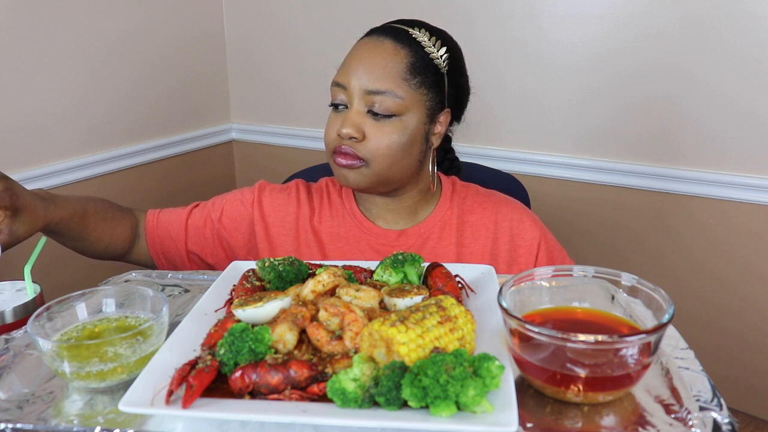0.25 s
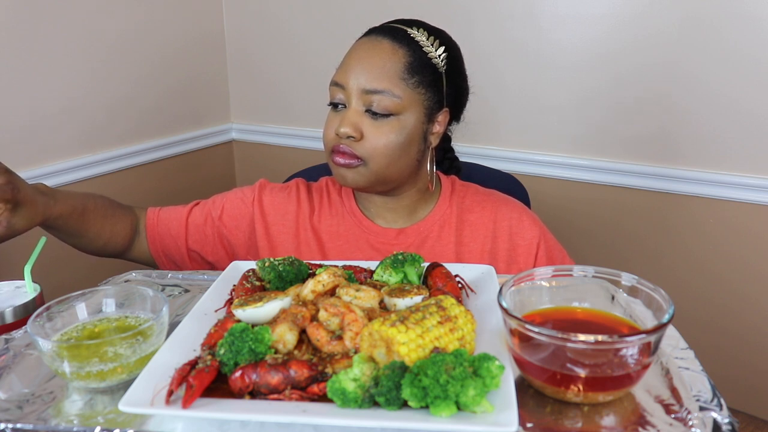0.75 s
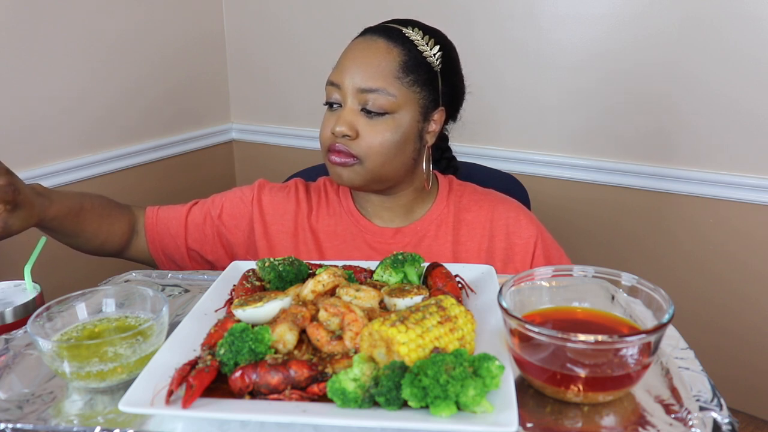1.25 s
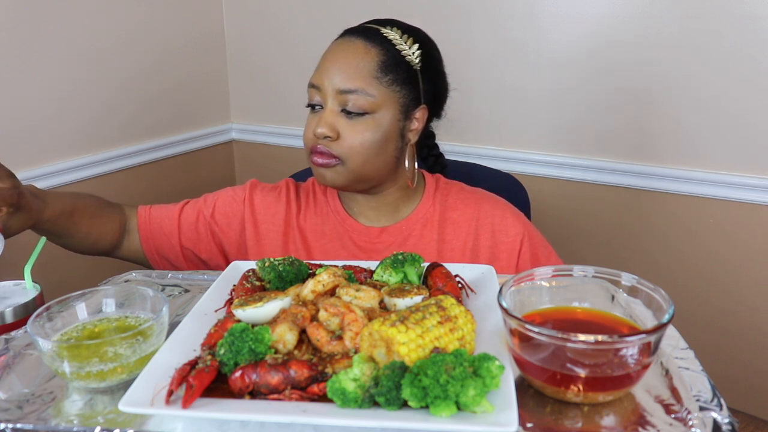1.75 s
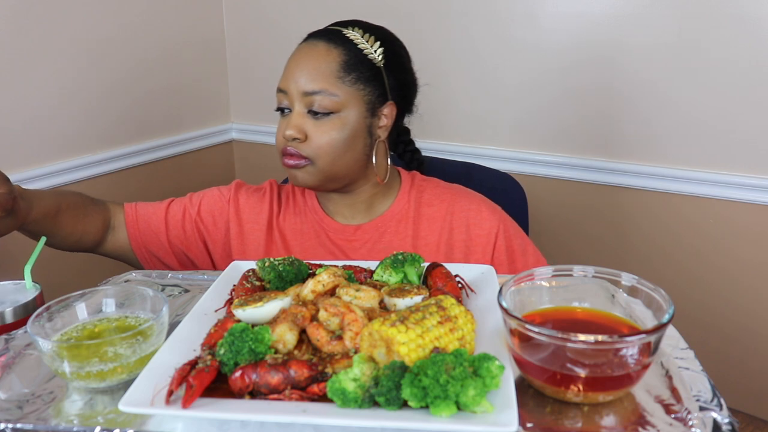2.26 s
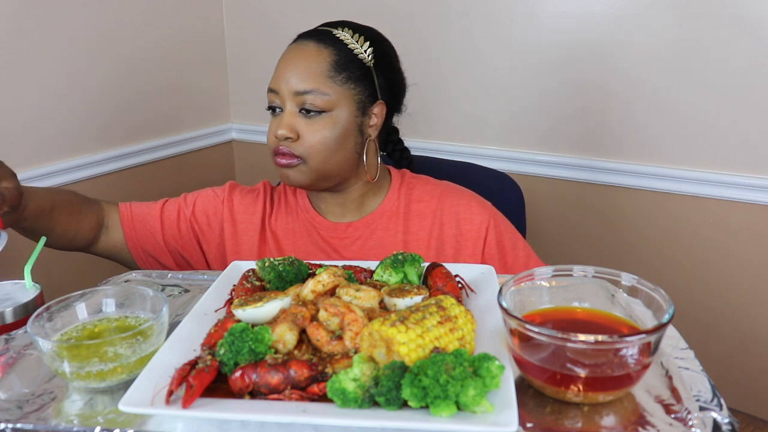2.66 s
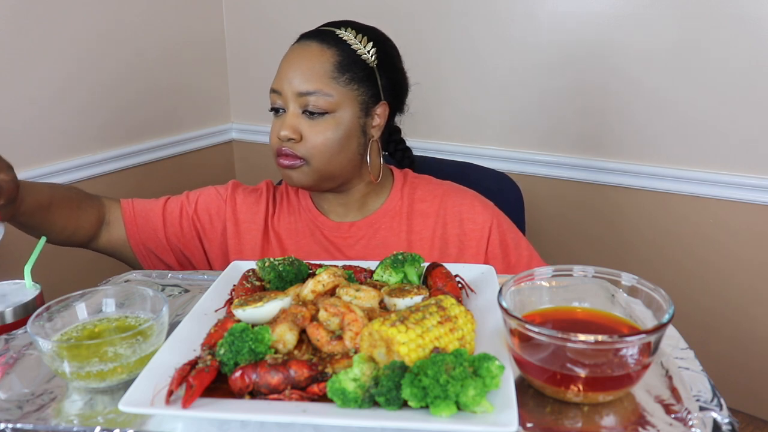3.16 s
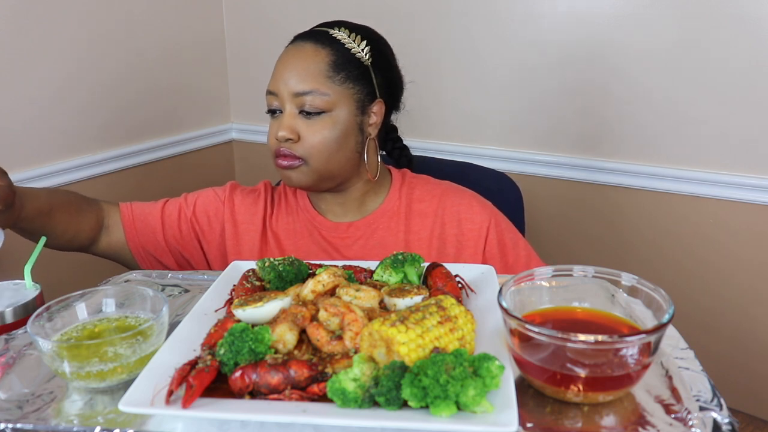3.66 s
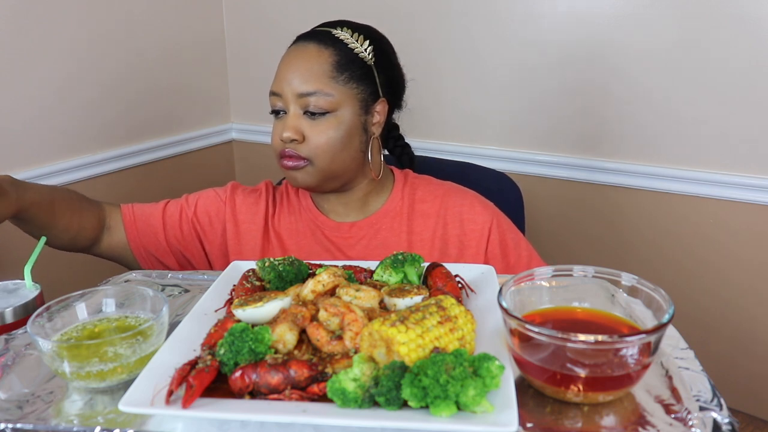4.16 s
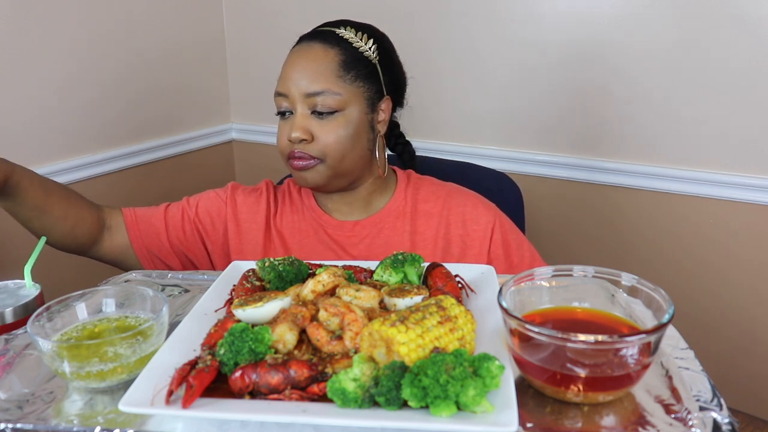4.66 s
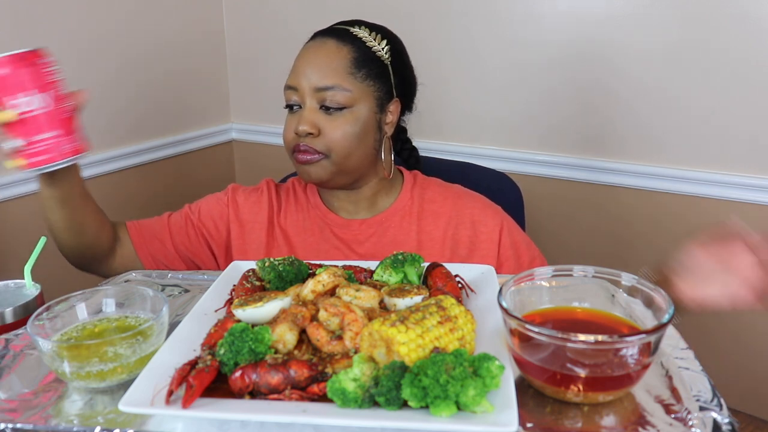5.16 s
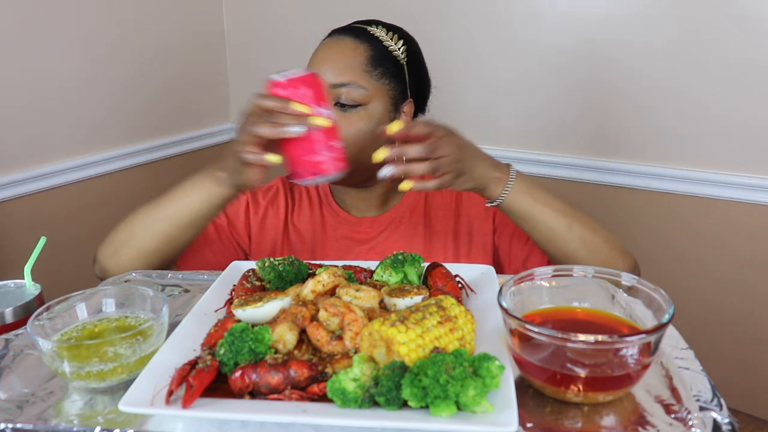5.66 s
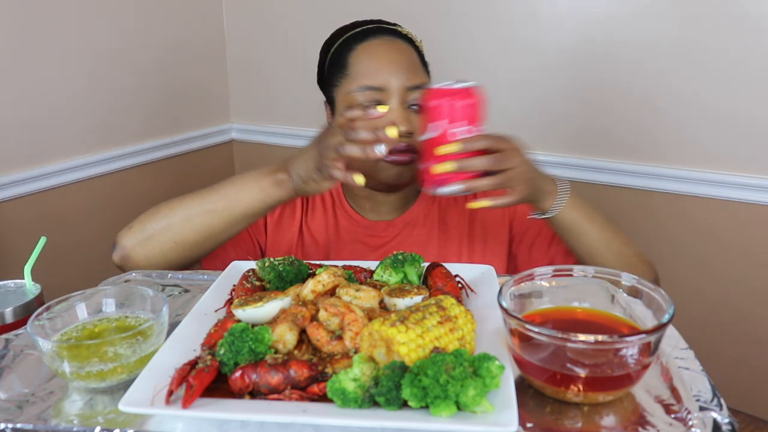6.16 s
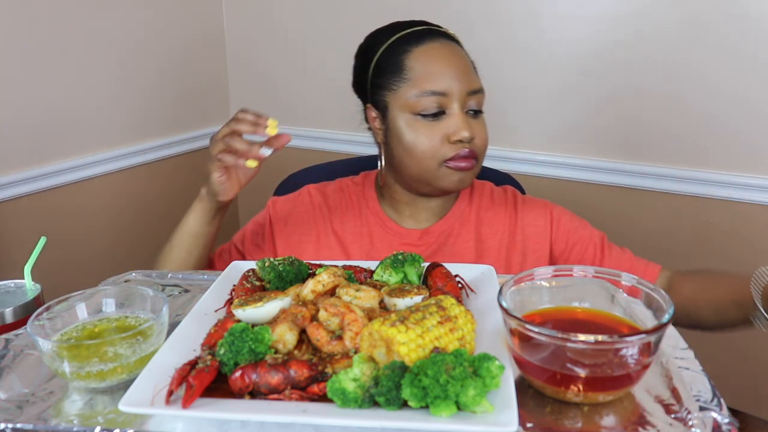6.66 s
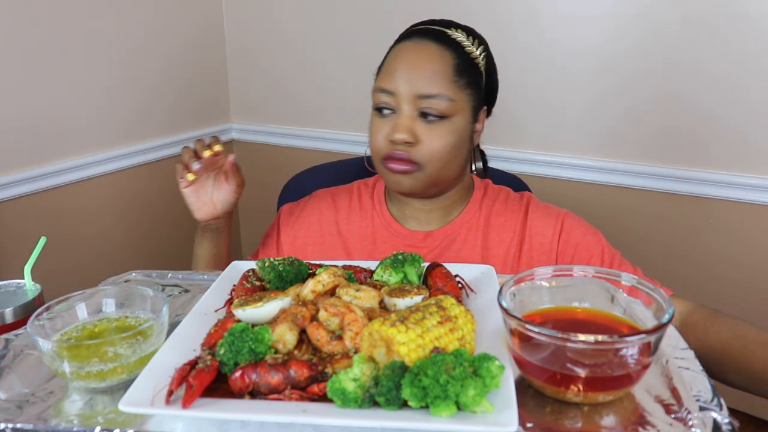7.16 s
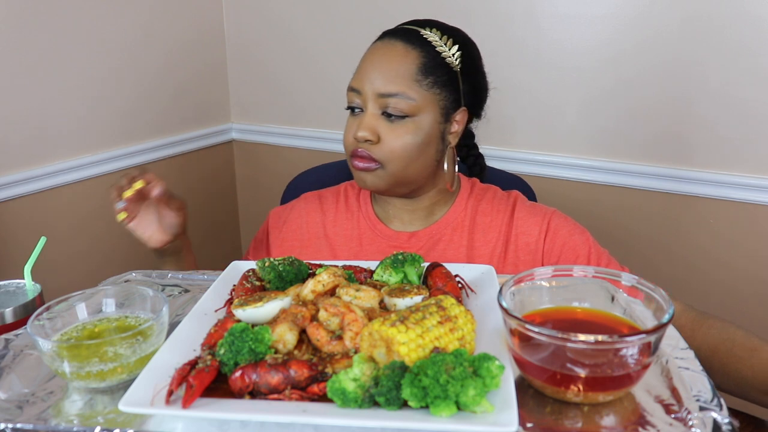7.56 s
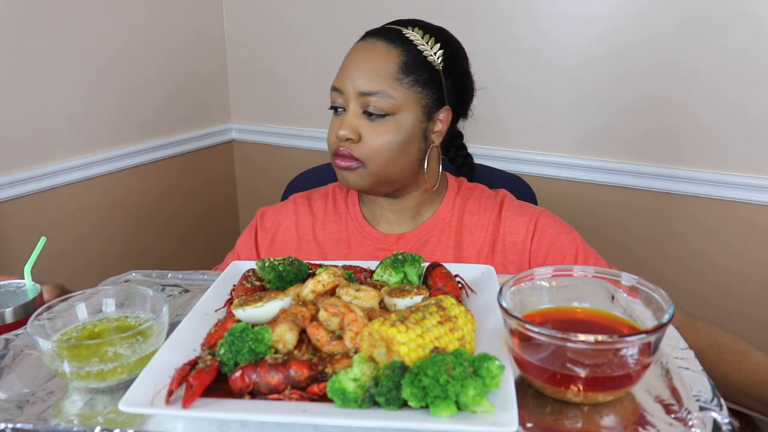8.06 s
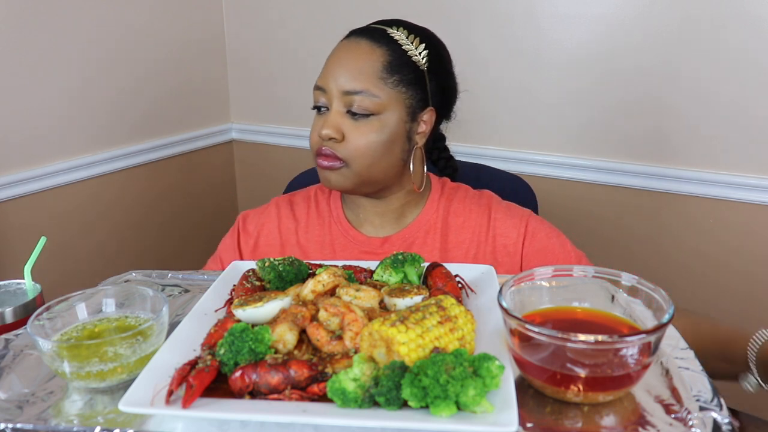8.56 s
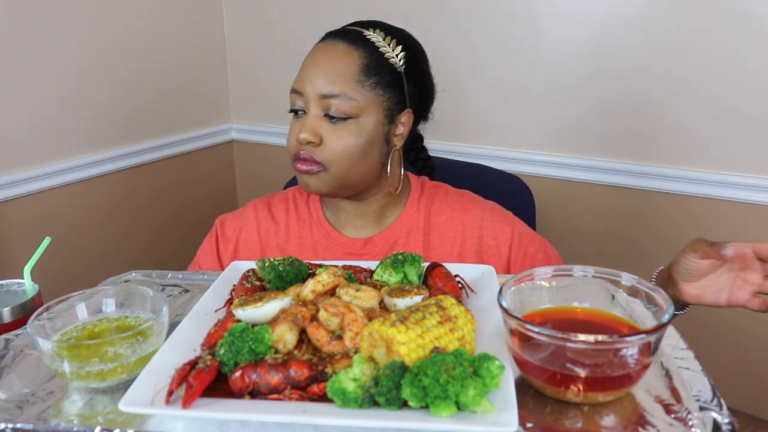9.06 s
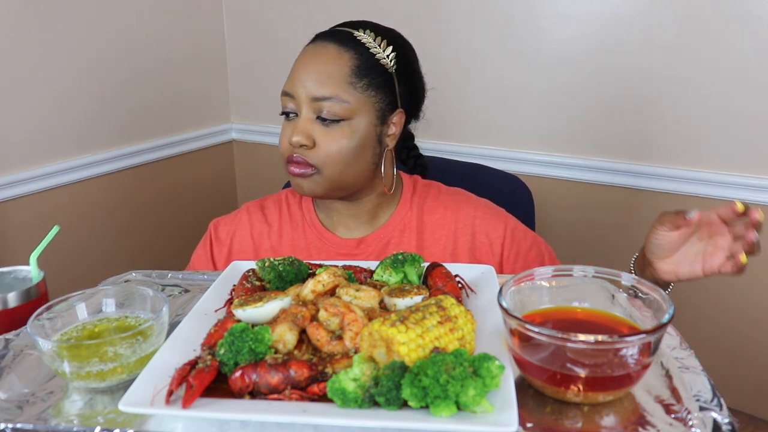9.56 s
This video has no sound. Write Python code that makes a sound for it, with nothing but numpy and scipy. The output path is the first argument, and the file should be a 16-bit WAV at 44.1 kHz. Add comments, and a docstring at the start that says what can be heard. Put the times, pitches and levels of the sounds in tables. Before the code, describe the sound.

A dense carbonated hiss swells and brightens, ice clunks, the fizz dies into tiny pops, and one hard can knock rings the tabletop.

```python
"""A small room with a low ventilation rumble, one microphone close to a cup on a table.
Soda is poured over ice: ringing bubbles and snapping films make a foam that swells, climbs in pitch and dies
to a crackle. Ice knocks on the cup's modes and cracks, lone bubbles plink and chains of them trill upwards.
The empty can is set down with one sharp knock that rings the table top; sleeves rustle faintly."""
import sys
import numpy as np
from scipy import signal
from scipy.fft import rfft, irfft, next_fast_len
from scipy.io import wavfile

SR = 44100
rng = np.random.default_rng(int(sys.argv[2]) if len(sys.argv) > 2 else 0)


def dump(signal):
    """Clip the signal to [-1, 1] and save it as 16-bit WAV at the path in sys.argv[1]."""
    limited = np.clip(np.atleast_2d(signal).T, -1, 1)
    pcm = np.round(limited * 32767).astype(np.int16)
    wavfile.write(sys.argv[1], SR, pcm)


N = 432621
T = np.arange(N) / SR  # time/s

# ventilation spectrum, relative: f/Hz, level/dB per Hz
AIR_SPECTRUM = [(30, -30), (45, -21), (60, -24), (85, -22.5), (125, -10.5), (165, -7), (215, 1), (300, -4),
                (450, -14.5), (700, -20.5), (1400, -25.5), (3000, -32), (15000, -26.5)]
HUM_DB = -62.5  # mains hum at rest
# the hum grows for a moment: from t/s, to t/s, ramp/s, rise/dB
HUM_SWELL = (5.7, 6.8, 0.1, 7.5)

# rustle of cloth, relative: f/Hz, level/dB per Hz
CLOTH_SPECTRUM = [(200, -27), (500, 4), (800, 3.5), (1400, -2.5), (3000, -5), (10000, -15)]
# the arms move and the sleeves brush: middle t/s, half length/s, level/dB
ARM_MOVES = [(5.95, 0.48, -60.5), (6.9, 0.53, -60.5), (9.245, 0.53, -63)]
CLOTH_REST_DB = -80

# colour that the cup gives the ringing bubbles, relative: f/Hz, level/dB
BUBBLE_COLOUR = [(700, -39), (1000, -1.5), (1450, 5), (2200, -9), (2600, -0.5), (3100, -6.5), (4100, 0.5),
                 (5400, -4.5), (6400, -2.5), (8500, -2.5), (10000, 1.5)]
# snapping films, relative: f/Hz, level/dB per Hz
SNAP_SPECTRUM = [(8000, 5), (9400, -5), (10700, -2.5), (13000, 2), (15500, -8)]
# bubble size: t/s, commonest pitch f/Hz, fall towards finer bubbles/dB per octave
BUBBLE_SIZE = [(0, 1470, 3), (1.0, 2300, 2.5), (1.7, 3910, 6), (2.5, 4870, 14), (3.1, 3600, 1.5),
               (3.9, 4500, 6), (4.45, 5900, 7.5), (5.6, 7640, 13), (9.0, 7500, 0)]
# air resonances of the cup: f/Hz, width/Hz, boost/dB
CUP_PEAKS = [(2008, 65, 5), (2390, 750, 3), (3570, 220, 0.5), (4300, 117, -0.5), (5250, 180, 3),
             (6280, 1040, 3), (7560, 310, 3)]
# the foam builds while the drink is poured, holds, then dies away
# its levels are relative: the gains in foam() and cup() come on top
RING_START_DB, RING_FULL_DB, RING_REST_DB = -38.5, -34.5, -55.5  # ringing bubbles
RING_BUILD_FROM_S, RING_FULL_S, RING_FADE_FROM_S, RING_FADE_S = 0.78, 1.84, 4.13, 2.72
SNAP_START_DB, SNAP_FULL_DB, SNAP_REST_DB = -47, -43, -56  # snapping films
SNAP_BUILD_FROM_S, SNAP_FULL_S, SNAP_FADE_FROM_S, SNAP_FADE_S = 0.2, 3.3, 4.73, 1.8
POURING_BURSTS_PER_S, RESTING_BURSTS_PER_S, THINNING_FROM_S, THINNING_S = 28000, 1300, 4.1, 1.25
SNAP_SPREAD_DB = 4.2

# ice knocks against the cup: t/s, level/dB, contact brightness f/Hz
ICE_KNOCKS = [(.589, -19, 2500), (2.923, -1.5, 3000), (2.929, 2, 600), (2.9415, -4.5, 1200),
              (2.993, -4, 250)]
# modes of the filled cup: f/Hz, level/dB, t60/s
CUP_BODY = [(170, -34.5, 0.07), (207, -29, 0.091), (286, -26, 0.1), (470, -28.5, 0.029), (800, -25, 0.017),
            (910, -30, 0.035), (1030, -30, 0.031), (1290, -29, 0.02), (1600, -26, 0.007), (2450, -40, .025)]
# dull thumps of handling and, near 8.07 s, of the can settling: t/s, peak level/dB, f/Hz
BUMPS = [(0.789, -45, 190), (1.478, -43.5, 363), (1.496, -38, 164), (1.736, -41, 171), (2.123, -40, 156),
         (8.072, -36.5, 510), (8.08, -38, 375), (9.442, -35, 196), (9.471, -35, 180), (9.508, -35.5, 252)]
BUMP_T60_S = 0.067
# two dry ice cracks, each followed about 2 ms later by a weaker reflection: t/s, peak level/dB, f/Hz, t60/s
CRACKS = [(3.4028, -17, 1280, 0.0055), (3.405, -34, 1410, .006), (3.5408, -7, 1700, 0.0021),
          (3.5428, -23, 1480, 0.01)]

# single pops at set times, most of them short, one faint and ringing: t/s, peak level/dB, f/Hz, t60/s
SINGLE_POPS = [(6.098, -41, 3100, .015), (6.19, -47, 3000, 0.17), (6.202, -33, 2400, .004),
               (6.205, -31, 3500, .0045), (7.4827, -31, 6700, .01), (8.593, -30, 5740, .007),
               (8.7675, -28, 9530, 0.0026), (8.8595, -30, 3670, 0.002), (9.137, -29, 6690, .003),
               (9.3898, -31, 9050, .004)]
# once the foam has thinned, stray bubbles burst at random
STRAY_FROM_S, STRAY_DB, STRAY_SPREAD_DB, STRAY_T60_S = 4.8, -34.5, 4, 0.008
STRAY_HZ, STRAY_SPREAD_OCTAVES, STRAY_DB_PER_OCTAVE = 6700, 0.386, 3

# the largest lone bubbles: t/s, peak level/dB, starting f/Hz
PLINKS = [(6.6473, -26.5, 4130), (6.802, -33, 3600), (6.862, -31.5, 5350), (6.93, -28, 4030),
          (7.0814, -39, 3750), (7.916, -36, 4040), (8.4777, -39, 2340), (8.488, -33, 2950),
          (8.575, -38.5, 3140), (9.4615, -39.5, 5570), (9.549, -43, 2450), (9.6346, -40, 3970),
          (9.665, -39, 4580)]
# chains of shrinking bubbles: start t/s, length/s, first f/Hz, last f/Hz, middle peak level/dB, pitch scatter/share
TRILLS = [(6.624, 0.29, 4350, 6200, -39.5, 0.086), (6.9, 0.31, 6100, 8700, -38.5, .04),
          (8.475, 0.17, 2500, 6160, -47.5, 0.072), (9.105, .05, 2570, 6260, -53, .12),
          (9.174, 0.22, 6500, 8150, -43, .1), (9.45, 0.13, 6000, 8700, -45.5, 0.089),
          (9.568, .04, 3200, 5600, -54.5, .04), (9.634, 0.2, 4300, 6100, -46.5, .05)]
# a rise is the mean share by which the pitch lies above its start over one t60
PLINK_T60_S, PLINK_RISE = .014, .1
CHAIN_T60_S, CHAIN_RISE = .012, .04

# the can lands and settles: t/s, level/dB, contact brightness f/Hz
CAN_KNOCKS = [(7.8535, 0, 3020), (8.07, -23, 600)]
# modes of can and table top: f/Hz, level/dB, t60/s
TABLE_MODES = [(265, -37, .4), (287, -37, .4), (340, -30, .27), (371, -29, .33), (428, -30, .2),
               (488, -24, .12), (544, -29, .2), (686, -28, .21), (737, -25, .21), (840, -29, .25),
               (904, -32, .33), (969, -30, .22), (1039, -30, .19), (1145, -27, .22), (1245, -29, .25),
               (1303, -35, .25), (1400, -31, .18), (1556, -31, .16), (1663, -26, .15), (1701, -25, .2),
               (1846, -36, .2), (1960, -37, .18), (3138, -39, .2), (3262, -42, .2), (5545, -47, .17),
               (5776, -46, .17)]
# dense rattle of the table top, relative: f/Hz, level/dB per Hz
RATTLE_SPECTRUM = [(120, -24), (220, 0), (330, -0.5), (900, 1), (1750, -1), (2400, -25), (3200, -12),
                   (4300, -29), (5700, -11), (7500, -32), (12000, -70)]
# the can slides a little as it is let go: middle t/s, half length/s, level/dB
SLIDE = (8.16, 0.02, -59.5)
CLACK_DB = -8.0

CUP_ROOM_T60_S = .22
CUTOFF_HZ = 15750  # top of the microphone's range


def from_db(db):
    """Decibels to gain."""
    return 10 ** (np.asarray(db) / 20)


def rms_one(x):
    """Scale to unit power."""
    return x / np.sqrt(np.mean(x ** 2) + 1e-20)


def at_hz(points, hz):
    """Read a spectrum in dB on a log-frequency axis."""
    f, db = np.transpose(points)
    return np.interp(np.log(hz + 1e-9), np.log(f), db)


def coloured(x, spectrum):
    """Give a signal a spectrum by weighting its frequencies; rms 1."""
    size = next_fast_len(N)
    gain = from_db(at_hz(spectrum, np.fft.rfftfreq(size, 1 / SR)))
    return rms_one(irfft(rfft(x, size) * gain, size)[:N])


def low_cut(x, hz):
    """Second-order high-pass."""
    return signal.sosfilt(signal.butter(2, hz, "high", fs=SR, output="sos"), x + 1e-18)


def decay(t, t60):
    """Exponential decay that falls 60 dB in t60."""
    return np.exp(-np.log(1000) * t / t60)


def ring(clicks, hz, t60):
    """A two-pole resonator: a unit click sets a sine of height 1 ringing."""
    r = decay(1 / SR, t60)
    w = 2 * np.pi * hz / SR
    return signal.lfilter([0, np.sin(w)], [1, -2 * r * np.cos(w), r * r], clicks + 1e-18)


def add_ping(out, s, db, hz, t60, rise=0.):
    """Add one dying sine, whose pitch may climb as it dies."""
    t = T[:int(t60 * SR)]
    cycles = hz * t * (1 + rise * t / t60)
    ping = from_db(db) * np.sin(2 * np.pi * cycles) * decay(t, t60)
    place = out[int(s * SR):][:len(t)]
    place += ping[:len(place)]


def thuds(rows, low_cut_hz):
    """Damped blows, each with one main resonance; small things radiate no deep bass."""
    out = np.zeros(N)
    for s, db, hz, t60 in rows:
        add_ping(out, s, db, hz, t60)
    return low_cut(out, low_cut_hz)


def pushes(rows):
    """Contact forces; a soft contact is a longer push."""
    out = np.zeros(N)
    for s, db, bright_hz in rows:
        soft = np.exp(-2 * np.pi * bright_hz / SR)
        click = np.arange(N) == int(s * SR)
        out += from_db(db) * signal.lfilter([1 - soft], [1, -soft], click + 1e-18)
    return out


def ventilation(air_db=-50.0, hum_hz=120):
    """A low rush of air, as coloured noise, and a mains hum, as a sine that swells once."""
    from_s, to_s, ramp_s, rise_db = HUM_SWELL
    swell = np.clip(np.minimum(T - from_s, to_s - T) / ramp_s, 0, 1)
    hum = from_db(HUM_DB + rise_db * swell) * np.sin(2 * np.pi * hum_hz * T)
    return from_db(air_db) * coloured(rng.standard_normal(N), AIR_SPECTRUM) + hum


def sleeves():
    """A faint rustle of cloth, as coloured noise that swells with each arm movement."""
    level = from_db(CLOTH_REST_DB)
    for s, half_s, db in ARM_MOVES:
        level = level + from_db(db) * np.exp(-((T - s) / half_s) ** 2)
    return level * coloured(rng.standard_normal(N), CLOTH_SPECTRUM)


def dying(from_s, fade_s):
    """One until from_s, then an exponential fall with time constant fade_s."""
    return np.exp(-np.maximum(T - from_s, 0) / fade_s)


def build_and_fade(start_db, full_db, rest_db, build_from_s, full_s, fade_from_s, fade_s):
    """A level in dB that climbs, holds and settles to rest."""
    poured_db = np.interp(T, [build_from_s, full_s], [start_db, full_db])
    return rest_db + (poured_db - rest_db) * dying(fade_from_s, fade_s)


def bursts(per_s, spread_db, largest):
    """Random clicks of either sign and uneven size, scaled so that power does not follow their rate."""
    sizes = from_db(spread_db * np.minimum(rng.exponential(1, N), largest))
    signs = rng.choice([-1, 1], N)
    happens = rng.random(N) < per_s / SR
    return sizes * signs * happens / np.sqrt(per_s)


def grains(clicks, pitches, cycles, band_db):
    """Deal clicks to briefly ringing bubbles with levels band_db(Hz); the gains are scaled to unit power."""
    dealt = rng.integers(0, len(pitches), N)
    out, power = 0, 0
    for k, hz in enumerate(pitches):
        # the square root allows for bands that widen with pitch
        gain = np.sqrt(hz) * from_db(band_db(hz))
        # a bubble radiates nothing far below its own pitch
        edges = np.diff(clicks * (dealt == k), prepend=0)
        voice = ring(edges, hz, cycles / hz)
        out = out + gain * rms_one(voice)
        power = power + gain ** 2
    return out / np.sqrt(power)


def foam(below_db=13.0, ring_gain_db=-0.44, snap_gain_db=3.0, count=40):
    """Bursting bubbles ring briefly around a common pitch, and their films snap far above it."""
    ring_db = build_and_fade(RING_START_DB, RING_FULL_DB, RING_REST_DB,
                             RING_BUILD_FROM_S, RING_FULL_S, RING_FADE_FROM_S, RING_FADE_S)
    snap_db = build_and_fade(SNAP_START_DB, SNAP_FULL_DB, SNAP_REST_DB,
                             SNAP_BUILD_FROM_S, SNAP_FULL_S, SNAP_FADE_FROM_S, SNAP_FADE_S)
    extra_per_s = POURING_BURSTS_PER_S - RESTING_BURSTS_PER_S
    per_s = RESTING_BURSTS_PER_S + extra_per_s * dying(THINNING_FROM_S, THINNING_S)
    size_s, size_hz, finer_db = np.transpose(BUBBLE_SIZE)
    octave = np.log2(np.interp(T, size_s, size_hz))
    above_db = np.interp(T, size_s, finer_db)

    def sizes_db(hz):
        """Bubbles much larger or smaller than the common size are weak."""
        away = np.log2(hz) - octave
        return at_hz(BUBBLE_COLOUR, hz) + np.minimum(below_db * away, -above_db * away)

    ring_clicks = bursts(per_s, spread_db=0.0, largest=4.2)
    rings = grains(ring_clicks, np.geomspace(850, 9500, count), 17.7, sizes_db)
    # above the finest ringing bubble only the films are heard
    rings = signal.sosfilt(signal.butter(6, 10500, fs=SR, output="sos"), rings)
    snap_clicks = bursts(per_s, SNAP_SPREAD_DB, largest=3.3)
    snaps = grains(snap_clicks, np.geomspace(8500, 15500, 9), 9.3, lambda hz: at_hz(SNAP_SPECTRUM, hz))
    return from_db(ring_db + ring_gain_db) * rings + from_db(snap_db + snap_gain_db) * snaps


def cup(x, loss_db=-2.0):
    """The air above the drink resonates and shifts a few bands, nearly all of them upwards."""
    for hz, width_hz, boost_db in CUP_PEAKS:
        band = signal.lfilter(*signal.iirpeak(hz, hz / width_hz, fs=SR), x)
        x = x + (from_db(boost_db) - 1) * band
    return from_db(loss_db) * x


def ice(low_cut_hz=150):
    """Shifting cubes strike the modes of the filled cup."""
    contacts = pushes(ICE_KNOCKS)
    body = np.zeros(N)
    for k, (hz, db, t60) in enumerate(CUP_BODY):
        sign = (-1) ** k  # neighbouring modes move in opposite senses
        body += sign * from_db(db) * ring(contacts, hz, t60)
    return low_cut(body, low_cut_hz)


def dull_bumps():
    """Dull thumps of handling and of the can settling, each one low, quickly damped sine."""
    return thuds([(*bump, BUMP_T60_S) for bump in BUMPS], low_cut_hz=120)


def ice_cracks():
    """Two dry cracks of the ice and their weaker reflections, all short damped sines."""
    return thuds(CRACKS, low_cut_hz=1130)


def pops(count=40):
    """Single pops at set times among random stray bursts; the higher strays tend to be the louder."""
    times = rng.uniform(STRAY_FROM_S, T[-1], count)
    sizes, pitches = np.clip(rng.standard_normal((count, 2)), -2, 2).T
    octaves = STRAY_SPREAD_OCTAVES * pitches
    levels_db = STRAY_DB + STRAY_SPREAD_DB * sizes + STRAY_DB_PER_OCTAVE * octaves
    strays = [(s, db, STRAY_HZ * 2 ** octave, STRAY_T60_S)
              for s, db, octave in zip(times, levels_db, octaves)]
    return thuds(SINGLE_POPS + strays, low_cut_hz=1300)


def large_bubbles(count=34):
    """Lone bubbles plink; in a chain the bubbles get smaller and higher."""
    out = np.zeros(N)
    for s, db, hz in PLINKS:
        add_ping(out, s, db, hz, PLINK_T60_S, PLINK_RISE)
    for start, length, first_hz, last_hz, db, scatter in TRILLS:
        for k, (late, size, detune) in enumerate(rng.standard_normal((count, 3))):
            along = (k + .3 * late) / count
            hz = (first_hz + along * (last_hz - first_hz)) * (1 + scatter * detune)
            add_ping(out, start + along * length, db + 2 * size, hz, CHAIN_T60_S, CHAIN_RISE)
    return low_cut(out, hz=2190)


def can(clack_hz=1380, clack_s=0.00067, rattle_db=-20.0, rattle_t60=0.23, low_cut_hz=200):
    """The can's base clacks on the table and sets its modes and a dense rattle going."""
    t = T[:SR]
    swell = t / clack_s
    envelope = (swell * np.exp(1 - swell)) ** 2  # peaks at clack_s
    blow = from_db(CLACK_DB) * envelope * np.sin(2 * np.pi * clack_hz * t)
    for k, (hz, db, t60) in enumerate(TABLE_MODES):
        blow += (-1) ** k * from_db(db) * ring(t == 0, hz, t60)
    rattle = coloured(rng.standard_normal(N), RATTLE_SPECTRUM)[:SR]
    blow += from_db(rattle_db) * rattle * decay(t, rattle_t60)
    slide_s, half_s, slide_db = SLIDE
    friction = from_db(slide_db) * rng.standard_normal(N) * np.exp(-((T - slide_s) / half_s) ** 2)
    contacts = pushes(CAN_KNOCKS) + friction
    return low_cut(signal.fftconvolve(contacts, blow)[:N], low_cut_hz)


def room(x, wet_db, t60):
    """Direct sound and a dying wash of wall reflections that starts 4 ms later."""
    t = T[:SR // 2]
    tail = rng.standard_normal(len(t)) * decay(t, t60) * (t > .004)
    wash = signal.fftconvolve(x, tail / np.linalg.norm(tail))[:N]
    return x + from_db(wet_db) * wash


def scene():
    """The cup is close and fairly dry; the bumps stir more of the room. Both channels are alike."""
    drink = cup(foam()) + large_bubbles() + pops() + ice_cracks()
    bumps = ice() + dull_bumps()
    near = room(drink, wet_db=-11.0, t60=CUP_ROOM_T60_S)
    knocks = room(bumps, wet_db=0.5, t60=0.14) + room(can(), wet_db=-14.5, t60=0.44)
    return np.tile(near + knocks + sleeves() + ventilation(), (2, 1))


def record(dry):
    """The microphone sheds deep bass, and the top is cut steeply."""
    thin = low_cut(dry, hz=76)
    return signal.sosfilt(signal.ellip(12, .1, 80, CUTOFF_HZ, fs=SR, output="sos"), thin)


dry = scene()
out = record(dry)
dump(out)
```